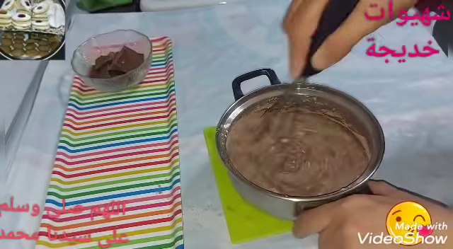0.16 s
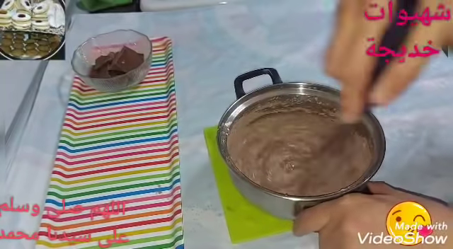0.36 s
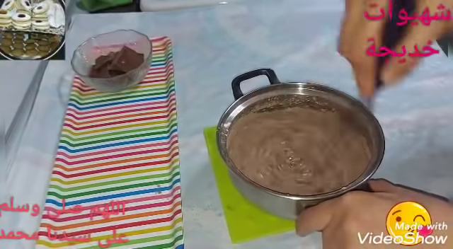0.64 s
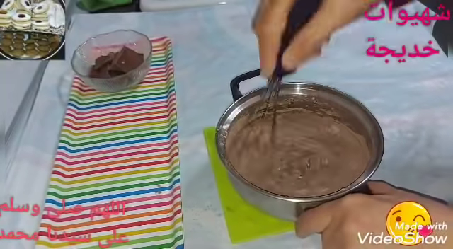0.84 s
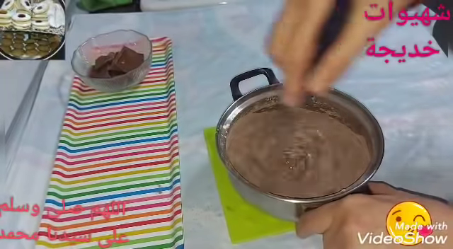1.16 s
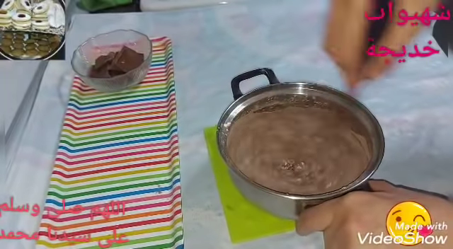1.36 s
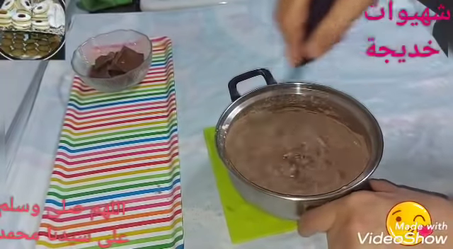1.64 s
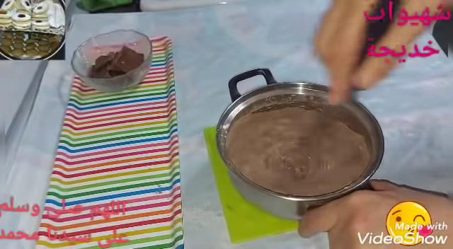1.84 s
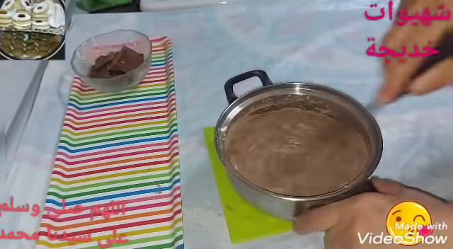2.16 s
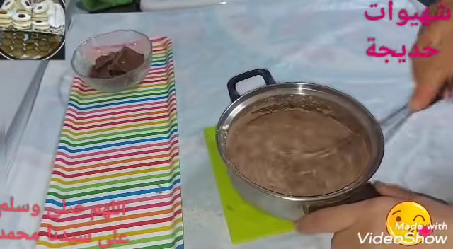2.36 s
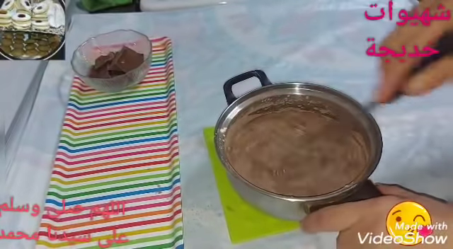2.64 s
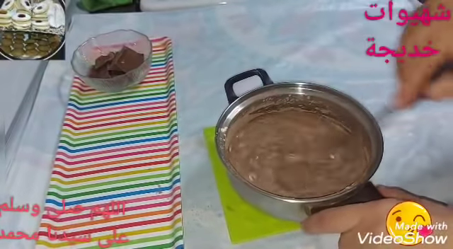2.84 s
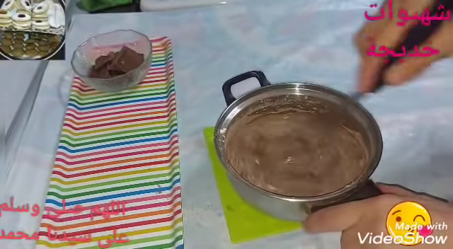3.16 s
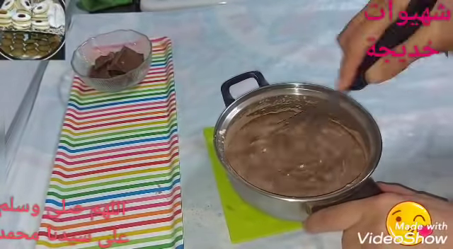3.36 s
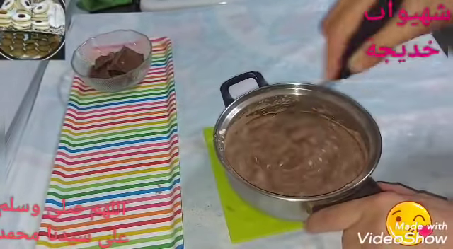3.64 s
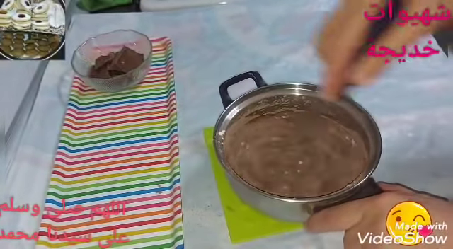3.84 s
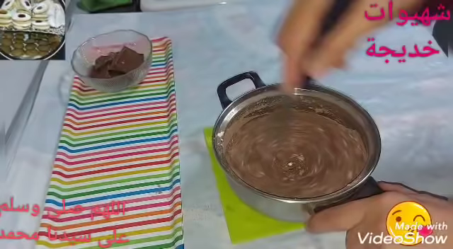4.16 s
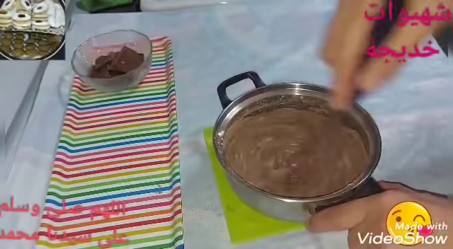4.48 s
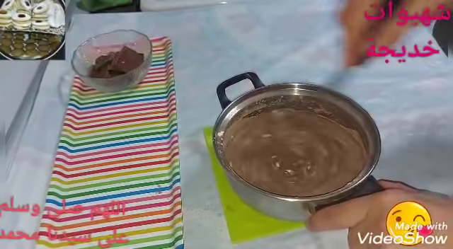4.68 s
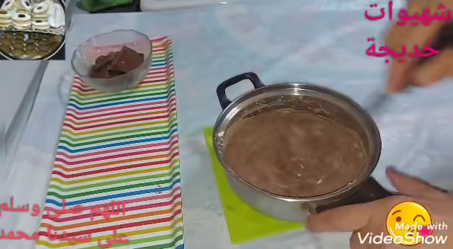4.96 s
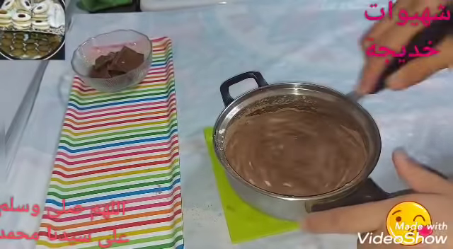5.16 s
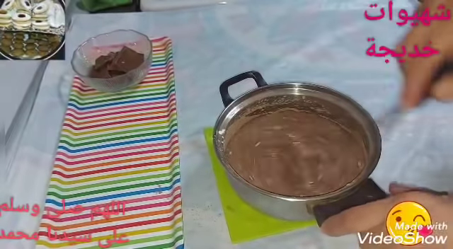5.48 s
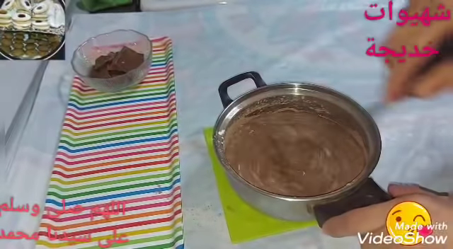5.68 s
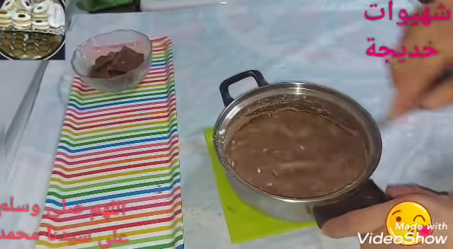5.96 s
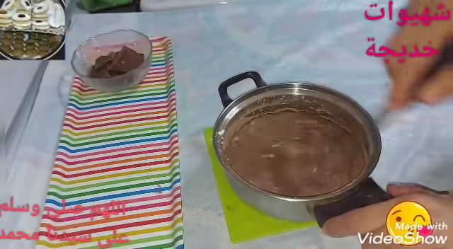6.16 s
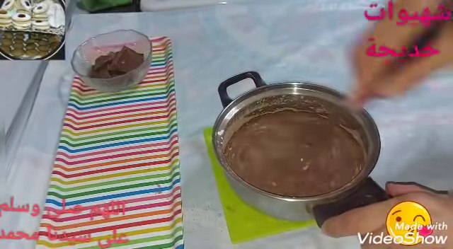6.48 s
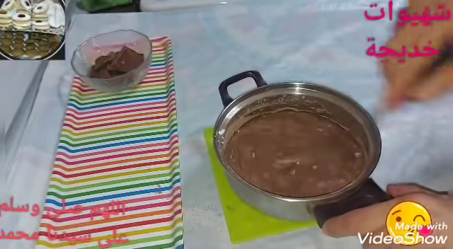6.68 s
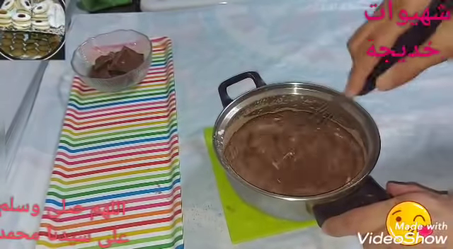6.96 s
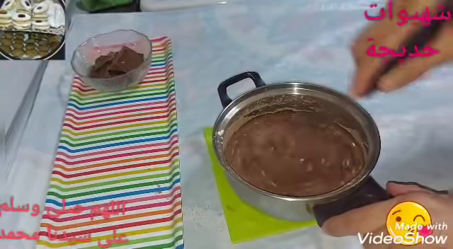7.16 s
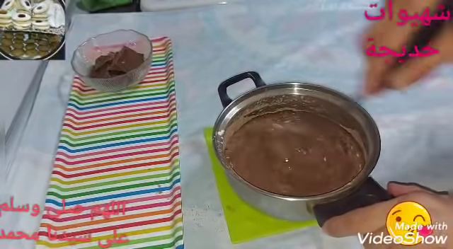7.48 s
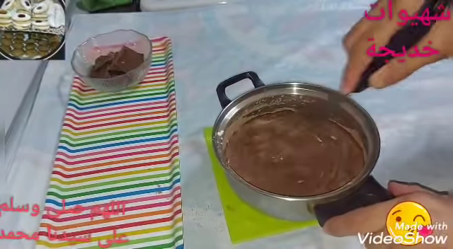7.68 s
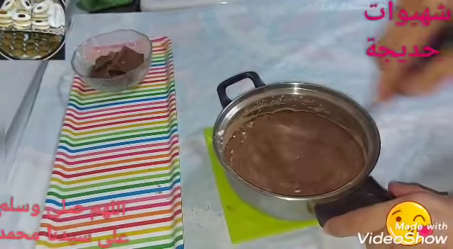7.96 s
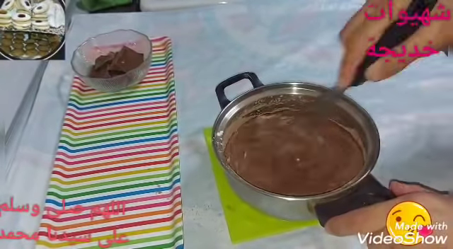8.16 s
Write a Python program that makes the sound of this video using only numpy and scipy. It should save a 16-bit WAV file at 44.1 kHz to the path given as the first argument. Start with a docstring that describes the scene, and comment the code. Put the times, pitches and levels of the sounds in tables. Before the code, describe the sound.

Brisk whisking in a metal saucepan: thin wires scrape and clatter on steel while runny liquid gurgles and spatters in a quiet kitchen.

```python
"""Whisk in a saucepan

A small, quiet kitchen: a wire whisk stirs thin chocolate cream round a steel pan, close to the microphone.
The wires scrape the bottom and clack against the wall: random slips and blows, coloured by steel.
The liquid sloshes, gurgles and plops between them: swarms of ringing bubbles and spatter.
The pan rocks on a cloth-covered table with a low rumble; behind it lie a faint wavering hum and still air."""
import sys
import numpy as np
from scipy import signal
from scipy.fft import rfft, irfft
from scipy.io import wavfile
from scipy.ndimage import uniform_filter1d

SR = 44100
rng = np.random.default_rng(int(sys.argv[2]) if len(sys.argv) > 2 else 0)


def unload_audio(sound):
    """Save the sound as a 16-bit wav file, at the path given as the first command line argument."""
    columns = np.transpose(np.atleast_2d(sound))
    # keep every value between -1 and 1, then stretch to whole-number steps
    steps = np.round(np.clip(columns, -1, 1) * 32767)
    wavfile.write(sys.argv[1], SR, steps.astype(np.int16))


N = 366912
T = np.arange(N) / SR  # time (s)
# Levels in the event tables are before the gain_db of the layer that plays them.

# sweeps of the whisk through the pan:
# middle t/s, length/s, wires on steel level/dB, surface slosh level/dB, deep gurgle level/dB
SWEEPS = [(0.003, 0.11, -50.5, -48, -45), (0.086, 0.034, -50.5, -44, -52), (0.16, 0.036, -38.5, -45, -70),
          (0.335, 0.12, -48.5, -50, -58), (0.543, 0.27, -45, -68, -70), (0.682, 0.36, -52.5, -61, -71),
          (0.855, 0.057, -44.5, -53, -51), (1.026, 0.25, -45.5, -53, -63), (1.178, 0.055, -38.5, -52, -62),
          (1.26, 0.042, -45, -62, -58), (1.398, 0.27, -46.5, -70, -81), (1.556, 0.13, -45.5, -51, -70),
          (1.643, 0.026, -43, -59, -42), (1.72, 0.27, -50, -74, -76), (1.972, 0.16, -46, -47.5, -50),
          (2.291, 0.07, -46, -43, -50.5), (2.492, 0.13, -45.5, -45.5, -44.5),
          (2.662, 0.067, -46.5, -45, -44.5), (2.851, 0.18, -48, -43.5, -73),
          (2.927, 0.075, -65, -59, -42.5), (3.084, 0.44, -48.5, -51, -52.5),
          (3.297, 0.065, -51.5, -42.5, -72), (3.437, 0.15, -45, -45.5, -50.5),
          (3.577, 0.12, -47.5, -42, -56), (3.667, 0.09, -42, -57, -47), (3.8, 0.15, -46.5, -45.5, -49),
          (3.947, 0.073, -41, -47, -60), (4.12, 0.27, -52, -51, -74), (4.315, 0.22, -48, -51, -75),
          (4.457, 0.014, -70, -39, -55), (4.564, 0.093, -51, -43, -61), (4.684, 0.051, -45.5, -48, -51.5),
          (4.874, 0.15, -52, -46.5, -52), (4.985, 0.028, -46, -51, -53), (5.121, 0.13, -44.5, -48, -44.5),
          (5.41, 0.23, -72, -54, -51), (5.694, 0.18, -48, -67, -56), (5.9, 0.15, -48.5, -49.5, -52),
          (6.022, 0.082, -47.5, -45, -55), (6.127, 0.068, -47, -48, -47), (6.227, 0.068, -45.5, -42, -60),
          (6.351, 0.048, -46, -53, -73), (6.476, 0.096, -50, -42.5, -43.5), (6.604, 0.12, -46, -55, -57),
          (6.714, 0.065, -44, -70, -52), (6.834, 0.15, -51, -52, -51), (6.928, 0.089, -47.5, -43, -61),
          (7.03, 0.069, -48.5, -42, -55), (7.144, 0.48, -53.5, -48, -71), (7.403, 0.088, -48, -42.5, -41),
          (7.508, 0.11, -45.5, -69, -60), (7.648, 0.11, -58, -41.5, -51.5), (7.738, 0.053, -43, -50, -48.5),
          (7.854, 0.065, -42, -47, -61), (8.022, 0.25, -46, -48.5, -71), (8.226, 0.084, -46.5, -44.5, -51)]
# lulls, where the whisk eases off and the pan hushes (a negative depth is a lift):
# middle t/s, length/s, depth for wires and slosh/dB, depth for gurgle/dB
LULLS = [(0.572, 0.038, 15, 19), (0.624, 0.038, 7.5, 15), (0.773, 0.018, 7.5, 11), (1.046, 0.018, 9, 22),
         (2.036, 0.044, 16.5, 19), (2.104, 0.068, 6, 7), (2.225, 0.11, 9, 7), (2.462, 0.026, 7, 19),
         (2.791, 0.034, 8.5, 2), (3.376, 0.041, 10, -4), (3.934, .014, 7, -3), (4.02, 0.06, 3.5, 12),
         (4.175, 0.025, 8, 1), (4.361, 0.039, 8.5, 14), (4.729, 0.058, 10.5, 13), (5.318, 0.05, -3, 9),
         (5.46, 0.037, 4, 33), (5.53, 0.03, 2, 9), (7.01, 0.039, 1, 0), (7.663, 0.037, 10.5, -2),
         (8.04, 0.052, 10, 2.5), (8.09, 0.045, -2, 25), (8.15, 0.036, 5, -1.5)]
# between sweeps the whisk keeps circling: wires, slosh and gurgle (dB)
GLIDE_DB, RIPPLE_DB, SWIRL_DB = -53, -53, -56.5


def stirring(steady_db, order):
    """Gain of a layer (order: 0 wires, 1 slosh, 2 gurgle): steady circling plus sweeps, hushed in the lulls."""
    power = amp(steady_db) ** 2
    for middle, length, *levels_db in SWEEPS:
        power = power + (amp(levels_db[order]) * swell(middle, length)) ** 2
    hush_db = sum(depths_db[order // 2] * swell(middle, length) for middle, length, *depths_db in LULLS)
    return np.sqrt(power) * amp(-hush_db)


# colour of wires rubbing on steel: f/Hz, relative level per Hz/dB
RUB_COLOUR = [(150, -17), (500, -8.5), (1200, -12.5), (3000, -9.5), (4500, -5), (6800, -5), (8300, -4.5),
              (9350, -0.5), (10100, -1), (11100, 0), (12500, -4), (14500, -13.5), (16000, -23)]


def scrape(pressure, gain_db=-4.0, hiss_db=0.5, flutter_db=3.0):
    """Tiny slips of the wires on steel over a smooth wet hiss, fluttering as wire after wire touches."""
    slips = unit(clicks(per_s=1900, spread_db=4.0))
    hiss = amp(hiss_db) * rng.standard_normal(N)
    flutter = amp(flutter_db * wander(size=600))
    rub = unit(colour(steadied(slips + hiss), RUB_COLOUR) * flutter)
    return amp(gain_db) * pressure * rub


# colour of wire ticking on wire: f/Hz, relative level per Hz/dB
TICK_COLOUR = [(300, -21), (1000, -8.5), (2000, 5), (3200, 0.5), (4500, -1.5), (6500, -7.5), (10000, -4.5),
               (16000, -9)]


def ticks(gain_db=-4.5, flutter_db=3.5):
    """Crossed wires tick against each other in small dry clumps."""
    grains = steadied(colour(clicks(per_s=480, spread_db=3.0), TICK_COLOUR), size=800)
    clumps = unit(grains * amp(flutter_db * wander(size=300)))
    return amp(gain_db) * stirring(GLIDE_DB, order=0) * clumps


# the bundle of wires hits the wall, levels rms over the attack:
# t/s, wires level/dB, wall level/dB, struck spot f/Hz, hollow knock level/dB, chatter t60/s, base thump level/dB
CLACKS = [(0.02, -38, -42, 2000, -57, 0.039, -79), (0.4382, -31, -28, 1750, -37, 0.025, -47.5),
          (0.52, -34, -36, 2280, -42, 0.11, -51), (0.607, -39.5, -47, 2130, -60, 0.069, -79),
          (0.888, -40, -43, 2400, -43, 0.034, -58), (1.168, -49, -33.5, 2940, -45, 0.11, -49),
          (1.513, -37, -37.5, 3300, -44, 0.077, -74), (1.552, -37, -35.5, 1900, -64, 0.032, -62),
          (1.708, -37.5, -49, 2560, -46, 0.022, -69), (1.9082, -40, -28, 1640, -65, 0.028, -56),
          (1.989, -53, -39, 1530, -68, 0.044, -52), (2.327, -39, -41.5, 2000, -59, 0.039, -80),
          (2.4295, -24.5, -40.5, 2900, -37.5, 0.06, -56), (2.473, -51, -38, 3060, -64, 0.03, -59),
          (2.552, -36, -38.5, 1920, -50, 0.06, -61), (2.67, -31, -54, 2000, -56, 0.023, -63),
          (2.872, -23, -39, 2180, -40, 0.11, -50), (2.906, -36, -50, 2200, -40, 0.043, -61),
          (3.111, -33.5, -55, 2000, -41, 0.051, -55), (3.4, -39, -42, 1580, -56, 0.031, -62),
          (3.421, -36, -39, 1600, -37, 0.063, -53), (3.574, -27.5, -43, 1620, -39.5, 0.083, -52),
          (3.664, -34.5, -57, 1800, -42, 0.056, -57), (3.906, -37, -42, 2800, -68, 0.04, -58),
          (3.941, -47, -44, 2070, -57, 0.039, -62), (3.958, -52, -41, 2200, -39.5, 0.12, -64),
          (4.2022, -39, -30.5, 1670, -42.5, 0.018, -58), (4.5658, -50, -29, 1780, -38.5, 0.02, -51),
          (4.603, -52, -37, 1550, -43, 0.026, -71), (4.855, -29, -37.5, 1980, -49, 0.07, -66),
          (5.096, -23.5, -31, 2400, -36, 0.018, -68), (5.5792, -31.5, -42, 1930, -42.5, 0.078, -64),
          (5.693, -41, -55, 2000, -60, 0.025, -55), (5.8042, -28.5, -44, 2500, -42, 0.023, -48.5),
          (5.918, -42, -54, 2500, -60, 0.025, -78), (6.0212, -26, -44, 2620, -44, 0.034, -52),
          (6.195, -42, -44, 2100, -40, 0.045, -71), (6.349, -44, -50, 2300, -60, 0.03, -60),
          (6.476, -27, -42, 2000, -39.5, 0.065, -51), (6.63, -40, -61, 1720, -46, 0.025, -75),
          (6.937, -29, -41, 1900, -33, 0.066, -52), (7.1632, -29.5, -44, 2200, -42, 0.1, -51.5),
          (7.383, -25, -36.5, 1850, -35, 0.057, -48), (7.467, -43, -58, 2200, -60, 0.025, -74),
          (7.736, -38.5, -57, 3260, -60, 0.12, -66), (7.747, -35, -45, 2200, -43, 0.046, -59),
          (7.843, -51, -35.5, 2400, -42, 0.064, -67), (7.856, -26.5, -38, 1810, -39, 0.15, -52),
          (8.113, -32.5, -41.5, 1700, -41, 0.066, -52.5), (8.189, -60, -39, 2100, -43, 0.053, -63),
          (8.237, -37, -38, 2110, -52, 0.1, -53)]
# ring of the wires: f/Hz, relative level/dB
WIRE_RING = [(1500, -22.5), (4000, -12), (6800, -17), (7700, -7.5), (8030, -3), (8500, -7), (9350, 4),
             (10100, -2.5), (11100, 2.5), (12200, -11.5), (13600, -9), (16000, -20)]
# colour of the struck wall: f/Hz, relative level/dB
WALL_COLOUR = [(100, -40), (500, -19), (1000, -18), (1500, 6.5), (2400, -0.5), (3300, 5.5), (4500, -1.5),
               (8000, -8)]
# colour of the hollow knock: f/Hz, relative level/dB
HOLLOW_COLOUR = [(100, -20), (200, -34), (450, -19), (700, -5), (1000, -6.5), (1250, -3), (1800, -22.5),
                 (3000, -38)]
# first wire's snap above the chatter (dB)
SNAP_DB = 12
# a faint swell of noise leads into each blow: time constant (s) and level (dB)
LEAD_S, LEAD_DB = .004, -13
# the rest of the bundle lands within (s), this far above the chatter (dB)
IMPACT_S, IMPACT_DB = .0035, 2.5


def clacks(gain_db=-8.0, rattle_db=2.0, pan_db=-5.5, wall_db=0.0, wall_width_hz=500, hollow_db=-7.0, ring_db=16.5):
    """Wires hit the wall and chatter to rest; wires, wall and pan ring. A faint swell of noise leads into each
    blow."""
    out, lead = np.zeros(N), SR // 50
    t = T[:SR // 6] - lead / SR  # zero at the blow
    for s, wires_db, body_db, hz, knock_db, t60, _ in CLACKS:
        chatter = rng.choice([-1, 1], len(t)) * amp(rattle_db * rng.standard_normal(len(t)))
        lead_noise = amp(LEAD_DB) * np.exp(-abs(t) / LEAD_S)
        decay = amp(-60 * abs(t) / max(t60, .01))
        blow = decay + amp(IMPACT_DB) * np.exp(-(t / IMPACT_S) ** 2)
        force = chatter * np.where(t < 0, lead_noise, blow)
        force[lead] += amp(SNAP_DB)  # the first wire lands
        wires = colour(force, WIRE_RING)
        slap = unit(colour(force, WALL_COLOUR))
        knock = unit(colour(force, HOLLOW_COLOUR))
        body = slap + amp(wall_db) * unit(resonate(slap, hz, wall_width_hz))
        hollow = knock + amp(ring_db) * unit(pan(knock))
        for part, db in (wires, wires_db + gain_db), (body, body_db + pan_db), (hollow, knock_db + hollow_db):
            attack_rms = np.std(part[lead:][:SR // 100])
            add(out, s + t[0], amp(db) * part / attack_rms)
    return out


# colour of the jolted base: f/Hz, relative level/dB
BASE_COLOUR = [(80, -21), (200, 5.5), (300, 10), (480, 1.5), (900, -23), (2000, -56)]


def thumps(gain_db=-8.0, ring_db=-5.5, fade_s=0.02, rise_s=0.0023):
    """Each clack also jolts the pan's base: a dull puff and the two lowest resonances."""
    out, t = np.zeros(N), T[:SR // 8]
    for s, *_, db in CLACKS:
        puff = unit(colour(rng.standard_normal(len(t)), BASE_COLOUR))
        ring = unit(sum(np.sin(2 * np.pi * (hz * t + rng.random())) for hz, _, _ in PAN_RING[:2]))
        envelope = np.minimum(t / rise_s, 1) * np.exp(-t / fade_s)
        thump = (puff + amp(ring_db) * ring) * envelope
        add(out, s, amp(db + gain_db) * thump / np.std(thump[:SR // 32]))
    return out


# colour of spatter and splash: f/Hz, relative level per Hz/dB
WET_COLOUR = [(100, -23), (500, -19.5), (1000, -6), (1600, 1.5), (2300, 0.5), (3300, -6), (4500, -17.5),
              (8000, -24)]


def slosh(gain_db=-3.0, spatter_db=-1.5, body_db=0.5, squelch_db=-2.5, pocket_hz=2000, roam_octaves=0.445,
          pocket_width_hz=420):
    """Bubbles and spatter in quick splats ring the pan and the ever-changing hollow behind the wires."""
    froth = bubbles(low_hz=1140, high_hz=3670, per_s=900, cycles=2.74, spread_db=3.5)
    spatter = unit(colour(clicks(per_s=2000, spread_db=4.0), WET_COLOUR))
    liquid = unit(froth + amp(spatter_db) * spatter)
    pocket = pocket_hz * 2 ** (roam_octaves * np.clip(wander(size=700), -2, 2))
    once = resonate(liquid, pocket, pocket_width_hz)
    squelch = steadied(unit(resonate(once, pocket, pocket_width_hz)), size=700)
    wet = liquid + amp(body_db) * unit(pan(liquid)) + amp(squelch_db) * squelch
    return amp(gain_db) * stirring(RIPPLE_DB, order=1) * splats() * steadied(wet)


# splats: rate (per s), decay time constant (s), burst height over a steady gain of 1, spread of sizes (dB)
SPLATS_PER_S, SPLAT_S, SPLAT_DEPTH, SPLAT_SPREAD_DB = 44, 0.015, 2.07, -2


def splats():
    """A gain, evened out slowly, that jumps as a wire breaks the surface and sinks soon after."""
    breaks = abs(clicks(SPLATS_PER_S, SPLAT_SPREAD_DB))
    bursts = signal.lfilter([1], [1, -np.exp(-1 / (SR * SPLAT_S))], breaks)
    return steadied(1 + SPLAT_DEPTH * bursts, size=2600)


# colour of the deeper folds of liquid: f/Hz, relative level per Hz/dB
DEEP_COLOUR = [(100, 1.5), (210, -12), (300, -10), (480, -2.5), (650, -7.5), (950, -6.5), (1400, -14),
               (3000, -37)]


def gurgle(gain_db=-5.5, wash_db=0.0, body_db=12.5, uneven_db=5.5):
    """Larger bubbles and the wash of the liquid folding over, heard in the pan."""
    folds = unit(amp(uneven_db * np.tanh(wander(size=1200))))  # the liquid opens and closes by turns
    pockets = bubbles(low_hz=635.0, high_hz=1089, per_s=260, cycles=4.2, spread_db=6.5)
    wash = unit(colour(clicks(per_s=450, spread_db=3.0), DEEP_COLOUR))
    liquid = unit(pockets + amp(wash_db) * wash)
    in_pan = steadied(liquid + amp(body_db) * unit(pan(liquid)))
    return amp(gain_db) * folds * stirring(SWIRL_DB, order=2) * in_pan


# pockets of air close in the liquid: t/s, peak level/dB, f/Hz, ring/cycles
PLOPS = [(0.08, -23.5, 3160, 3.4), (.346, -26, 1990, 2.5), (0.702, -27, 2110, 3.5),
         (0.817, -20.5, 1590, 3.4), (1.146, -18, 2250, 2.3), (1.396, -30.5, 2090, 2),
         (1.858, -27.5, 2330, 3), (1.956, -28, 1600, 4), (2.486, -17.5, 1450, 2), (2.654, -20, 2050, 3),
         (2.712, -23.5, 1985, 9.9), (2.751, -24.5, 1270, 2), (2.909, -17.5, 790, 7.6),
         (3.059, -26, 1330, 3), (3.509, -26, 2300, 9), (3.547, -20, 1150, 7.3), (3.586, -16.5, 1720, 2.9),
         (3.776, -28, 2120, 3.6), (3.881, -28, 1650, 3.3), (3.941, -21.5, 2070, 6.1),
         (3.997, -25.5, 1260, 2.7), (4.223, -19.5, 1900, 3.1), (4.245, -19.5, 2000, 5),
         (4.305, -25.5, 1540, 2.8), (4.77, -26.5, 1710, 6.3), (5.131, -21.5, 900, 2.4),
         (5.197, -22, 1295, 7), (5.417, -27, 2040, 3.3), (5.496, -28, 1740, 2.4), (5.551, -23, 2030, 4),
         (5.637, -22, 1146, 4.2), (5.713, -26, 1530, 3), (6.2, -20, 947, 12), (6.329, -23.5, 1530, 2),
         (6.424, -26, 1280, 3.6), (6.453, -22.5, 2570, 4), (6.592, -20, 1590, 3.1), (6.742, -37, 2630, 4),
         (6.772, -28, 2000, 1.8), (6.8, -24, 1460, 3), (6.855, -20.5, 1620, 4), (7.011, -26.5, 2050, 4.6),
         (7.08, -31, 2060, 3), (7.439, -21.5, 2060, 5.1), (7.628, -23.5, 3000, 4), (8.192, -23, 1400, 4.7),
         (8.211, -21, 2100, 6.8), (8.299, -24.5, 1370, 4)]


def plops(gain_db=-7.5, splash_db=-1.5, splash_s=0.0063):
    """A larger pocket closes: one ringing bubble inside a short splash."""
    out, t = np.zeros(N), T[:SR // 16]
    for s, db, hz, cycles in PLOPS:
        splash = colour(rng.standard_normal(len(t)) * np.exp(-t / splash_s), WET_COLOUR)
        sound = unit(bubble(hz, cycles, rise=0.018)) + amp(splash_db) * unit(splash)
        add(out, s, amp(db + gain_db) * sound / abs(sound).max())
    return out


def bubbles(low_hz, high_hz, per_s, cycles, spread_db, count=32):
    """A swarm of short bubbles whose pitches span a range in equal ratios."""
    swarm = np.zeros(N)
    for hz in np.geomspace(low_hz, high_hz, count):
        starts = clicks(per_s / count, spread_db)
        swarm += signal.oaconvolve(starts, bubble(hz, cycles, rise=0.091))[:N] * np.sqrt(hz)
    return unit(swarm)


def bubble(hz, cycles, rise):
    """A pocket of air rings for a few cycles, rising in pitch as it nears the surface."""
    t = T[:SR // 16]
    age = t * hz / cycles
    pitch = hz * (1 + rise * np.tanh(age / 2))
    envelope = np.exp(-age) * (1 - np.exp(-2 * t * hz))
    return np.sin(2 * np.pi * np.cumsum(pitch) / SR) * envelope


# resonances of the filled pan: f/Hz, width/Hz, relative level/dB
PAN_RING = [(293, 33, 1.5), (412, 15, -2.5), (669, 58, 2), (760, 30, -28), (977, 34, 10.5), (1142, 122, 7),
            (1423, 175, 2), (1647, 45, 5.5), (2040, 140, 6), (2450, 98, 3.5), (3230, 190, 5.5),
            (3220, 320, -31)]


def pan(x):
    """The damped resonances of the pan with liquid in it."""
    return sum(amp(db) * signal.lfilter(*signal.iirpeak(hz, hz / width, SR), x) for hz, width, db in PAN_RING)


def lifted(x, edge_hz=850, share=0.75):
    """In a lull the whisk rides high, so the low body sinks by a share of the gurgle's depth."""
    body = signal.sosfiltfilt(signal.butter(3, edge_hz, fs=SR, output="sos"), x)
    depth_db = sum(depth * swell(middle, length) for middle, length, _, depth in LULLS)
    return x - body * (1 - amp(-share * depth_db))


# echoes between the pan's walls: decay for clacks and plops (s), level for plops (dB)
CLACK_ECHO_S, PLOP_ECHO_DB = .004, -4


def stirred_echoes(x, gain_db, decay_s, size=4096):
    """Quick echoes between the pan's walls; their paths keep changing as the whisk circles."""
    out, t = np.zeros(N), T[:SR // 40]
    window = signal.windows.cosine(size)
    for start in range(0, N, size // 2):
        piece = x[start:start + size]
        paths = rng.standard_normal(len(t)) * np.exp(-t / decay_s) * (t > .0001)
        paths = paths / np.linalg.norm(paths)
        add(out, start / SR, signal.fftconvolve(piece * window[:len(piece)], paths))
    return amp(gain_db) * out


# the whisk shoves the pan on the table:
# start t/s, hold from the start/s, level/dB, pitch of the low tone f/Hz; near 0.9-1.7 s it is the faint hum
SHOVES = [(0.157, 0.027, -50.5, 71), (0.262, 0.079, -53, 40.7), (0.641, 0.055, -53, 52),
          (0.853, 0.037, -52, 90.5), (0.953, 0.11, -53.5, 81.2), (1.287, 0.15, -54.5, 77.3),
          (1.657, 0.13, -53.5, 82.3), (1.964, 0.031, -57, 51), (2.315, 0.044, -52.5, 45.4),
          (2.554, 0.063, -48, 40.8), (2.886, 0.017, -52, 59), (3.102, 0.022, -51, 60),
          (3.413, 0.026, -49, 42.7), (3.647, 0.058, -47.5, 76), (3.945, 0.041, -45, 52.8),
          (4.3, 0.039, -47.5, 45.7), (4.565, 0.1, -56, 54.2), (4.983, 0.068, -52.5, 44),
          (5.163, 0.078, -50, 44), (5.686, 0.072, -50, 43.2), (5.922, 0.029, -47.5, 49.6),
          (6.089, 0.11, -48, 51.3), (6.35, 0.13, -49.5, 43.7), (6.555, 0.12, -48.5, 42.6),
          (7.013, 0.045, -53, 46), (7.25, 0.031, -58, 60), (7.431, 0.13, -53, 51.3),
          (7.724, 0.071, -46, 46.8), (7.935, 0.067, -44.5, 48), (8.229, 0.089, -46.5, 46.7)]
# colour of the table's boom: f/Hz, relative level per Hz/dB
TABLE_COLOUR = [(15, -65), (31, -32.5), (38, -1), (52, -4.5), (68, -8), (82, -3.5), (100, -14.5),
                (125, -14.5), (200, -31.5), (400, -35), (1000, -103)]
SHOVE_RISE_S, SHOVE_FADE_S, RESTING_DB = 0.02, 0.059, -60.5  # resting level is that of the boom


def rumble(gain_db=-2.0, tone_db=4.0, sway=0.13):
    """Low swells that rise, hold and fade: a tone of unsteady pitch over the soft boom of the table."""
    power, tone, t = np.full(N, amp(RESTING_DB) ** 2), np.zeros(N), T[:SR // 2]
    pace = 1 + sway * wander(size=900)
    for s, hold, db, hz in SHOVES:
        fade = np.exp(-np.maximum(t - hold, 0) / SHOVE_FADE_S)
        push = amp(db) * np.minimum(t / SHOVE_RISE_S, 1) * fade
        turns = np.cumsum(hz * np.interp(s + t, T, pace)) / SR
        add(power, s, push ** 2)
        add(tone, s, push * np.sin(2 * np.pi * turns))
    boom = steadied(colour(rng.standard_normal(N), TABLE_COLOUR, size=16384), size=2000)
    return amp(gain_db) * np.sqrt(power) * boom + amp(tone_db) * tone


# faint low hum: t/s, level/dB
HUM_LEVEL = [(0, -69), (.7, -62.5), (1.1, -54), (1.5, -69), (2.2, -72), (6.72, -68), (6.83, -55),
             (7.13, -54), (7.22, -70), (7.3, -61.5), (7.77, -51), (7.9, -62), (8.32, -56)]


def hum(gain_db=0.5, hz=94.3):
    """A faint low tone that wavers in pitch and comes and goes."""
    pitch = hz * (1 + .04 * wander(size=3000))
    flutter = amp(3.5 * wander(size=2500))
    return amp(gain_db) * level(HUM_LEVEL) * flutter * np.sin(2 * np.pi * np.cumsum(pitch) / SR)


# reverberation of the kitchen: f/Hz, t60/s
KITCHEN_DECAY = [(200, 0.32), (1500, 0.048), (6000, 0.087), (15000, 0.044)]


def kitchen(x, gain_db):
    """The room's short tail, dying at a pace that depends on pitch and slowest in the bass."""
    t = T[:SR // 2]
    late_noise = rng.standard_normal(len(t)) * (t > .007)
    hz, age, z = signal.stft(late_noise, SR, nperseg=256)
    decay = amp(-60 * age / read(KITCHEN_DECAY, hz)[:, None])
    tail = signal.istft(z * decay, SR, nperseg=256)[1][:len(t)]
    return amp(gain_db) * signal.oaconvolve(x, tail / np.linalg.norm(tail))[:N]


# colour of the still room: f/Hz, relative level per Hz/dB
AIR_COLOUR = [(20, -9), (60, 17), (150, 13), (400, -29), (1000, -29), (4000, -8), (16000, -36)]


def air(gain_db):
    """The still room: steady coloured noise."""
    return amp(gain_db) * unit(colour(rng.standard_normal(N), AIR_COLOUR))


def amp(db):
    """Decibels to gain."""
    return 10 ** (np.asarray(db) / 20)


def unit(x):
    """Scales to rms 1."""
    return x / np.sqrt(np.mean(x ** 2) + 1e-20)


def level(curve):
    """Gain at every sample from rows (s, dB)."""
    return amp(np.interp(T, *np.transpose(curve)))


def read(points, hz):
    """Reads a table on a log-frequency axis."""
    f, value = np.transpose(points)
    return np.interp(np.log(hz + 1), np.log(f + 1), value)


def add(mix, s, sound):
    """Mixes a sound in at time s."""
    part = mix[max(round(s * SR), 0):][:len(sound)]
    part += sound[:len(part)]


def colour(x, points, size=4096):
    """Causal (minimum-phase) filter with the given spectrum, so that attacks stay sharp."""
    log_gain = np.log(amp(read(points, abs(np.fft.fftfreq(size, 1 / SR)))))
    taps = np.fft.ifft(np.exp(np.conj(signal.hilbert(log_gain)))).real
    return signal.fftconvolve(x, taps[:size // 2])[:len(x)]


def clicks(per_s, spread_db):
    """A random train of clicks of either sign, their sizes in dB spread exponentially."""
    chance = rng.random(N)
    size = np.minimum(rng.exponential(1, N), 4)
    sign = rng.choice([-1, 1], N)
    return (chance < per_s / SR) * sign * amp(spread_db * size)


def steadied(x, size=1500):
    """Evens out the slow level of a texture and keeps its grain."""
    power = uniform_filter1d(uniform_filter1d(x ** 2, size), size)
    return x / np.sqrt(abs(power) + 1e-12)


def swell(middle, length):
    """A smooth bell from 0 to 1 and back, as the hand speeds up and slows."""
    return np.exp(-np.minimum((2 * (T - middle) / length) ** 2, 20))


def wander(size):
    """Smooth chance of rms 1 that changes over about size samples."""
    return unit(uniform_filter1d(uniform_filter1d(rng.standard_normal(N), size), size // 2))


def resonate(x, hz, width):
    """A resonance of gain 1 that follows a fixed or moving pitch."""
    turn = np.exp(2j * np.pi * np.cumsum(hz * np.ones(len(x))) / SR)
    r = np.exp(-np.pi * width / SR)
    return 2 * (turn * signal.lfilter([1 - r], [1, -r], x / turn)).real


def scene(air_db=-70.5, own_db=0.0, rub_echo_db=0.0):
    """Whisk and liquid with their echoes, over the table's rumble and the still room."""
    pressure = stirring(GLIDE_DB, order=0)
    rub, liquid = scrape(pressure) + ticks(), slosh() + gurgle()
    hits, pops = clacks(), plops()
    low, jolts = rumble() + hum(), thumps()
    sides = []
    for _ in range(2):
        stir = rub + amp(own_db) * scrape(pressure) + liquid  # each side also faces wires of its own
        stir_echoes = stirred_echoes(liquid + amp(rub_echo_db) * rub, gain_db=4.0, decay_s=0.0059)
        hit_echoes = stirred_echoes(hits, gain_db=2.5, decay_s=CLACK_ECHO_S)
        pop_echoes = stirred_echoes(pops, gain_db=PLOP_ECHO_DB, decay_s=CLACK_ECHO_S)
        whisk = lifted(stir + stir_echoes) + hits + pops + hit_echoes + pop_echoes + jolts
        room = kitchen(whisk, gain_db=-17.5) + kitchen(low, gain_db=-20.5)
        sides.append(whisk + low + room + air(air_db))
    return np.array(sides)


# unlike colour of the two microphone ports: f/Hz, left minus right level/dB
PORT_LEAN = [(40, 1.5), (130, 6.5), (300, 4), (700, 3.5), (950, 2.5), (1300, 6), (2100, 3), (3200, 3.5),
             (4200, 1.5), (7000, 1), (8200, -3.5), (9400, 12), (10200, 15.5), (11000, 6), (13500, 9),
             (16000, -7)]
EDGE_HZ = 15750  # upper band limit


def record(dry, lag_s=.000015):
    """Two microphone ports of unlike colour, the right a little later, then the band limit."""
    hz = np.fft.rfftfreq(N, 1 / SR)
    lean = amp(read(PORT_LEAN, hz))
    lag = np.exp(-2j * np.pi * hz * lag_s)
    ports = np.array([lean, lag]) * 2 / (1 + lean)
    heard = irfft(rfft(dry) * ports, N)
    lowpass = signal.firwin(301, EDGE_HZ, window=("kaiser", 9), fs=SR)
    return signal.oaconvolve(heard, lowpass[None], "same")


dry = scene()
out = record(dry)
unload_audio(out)
```